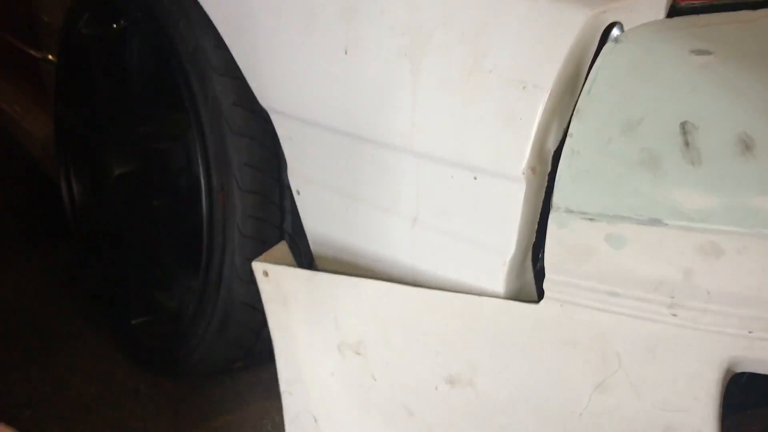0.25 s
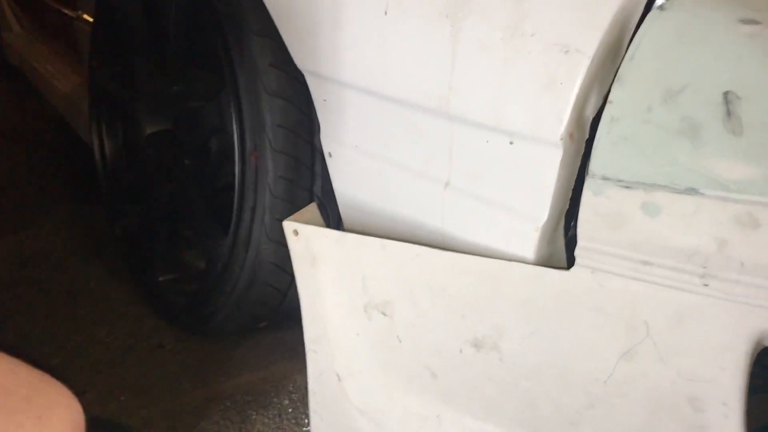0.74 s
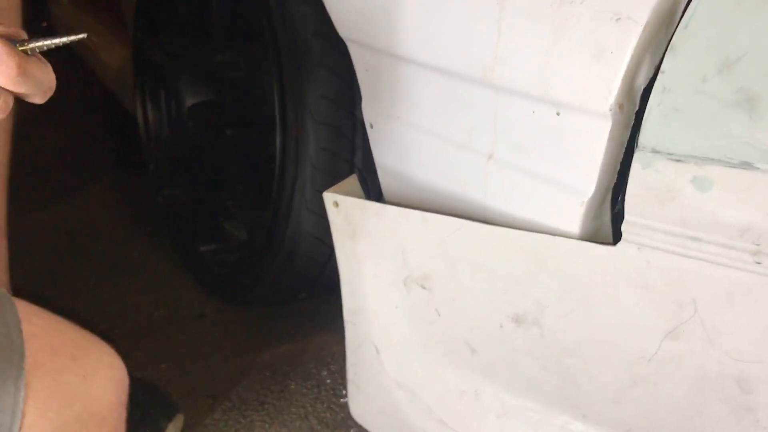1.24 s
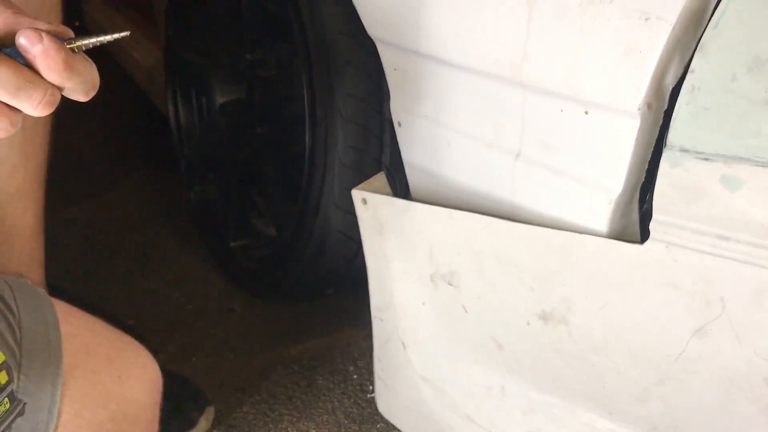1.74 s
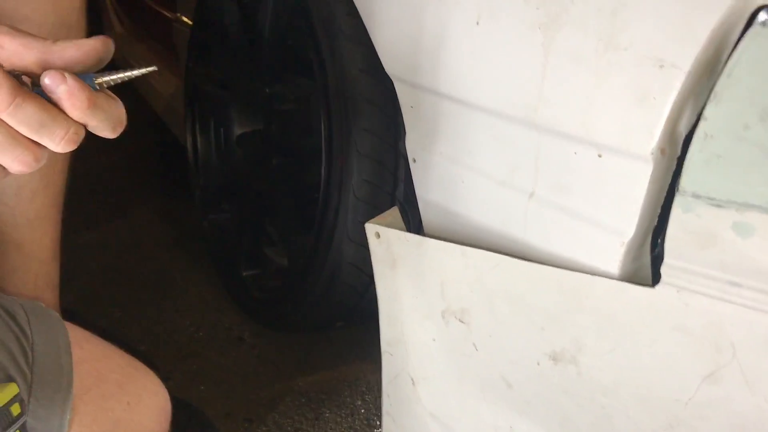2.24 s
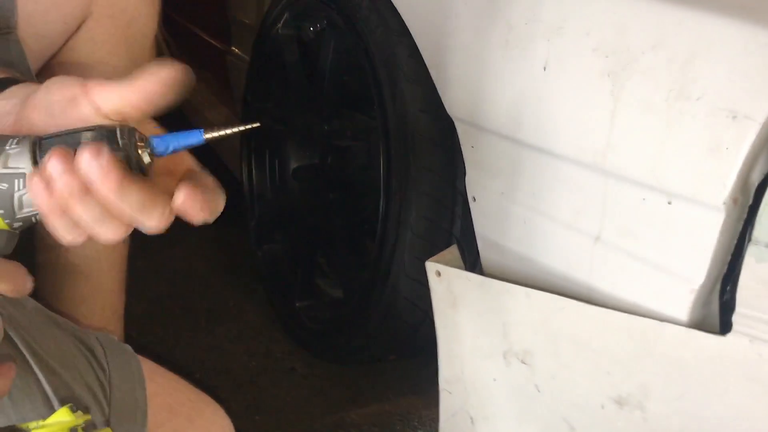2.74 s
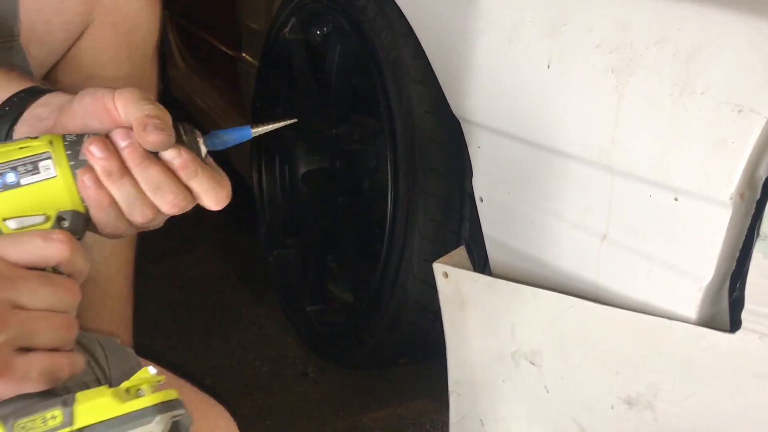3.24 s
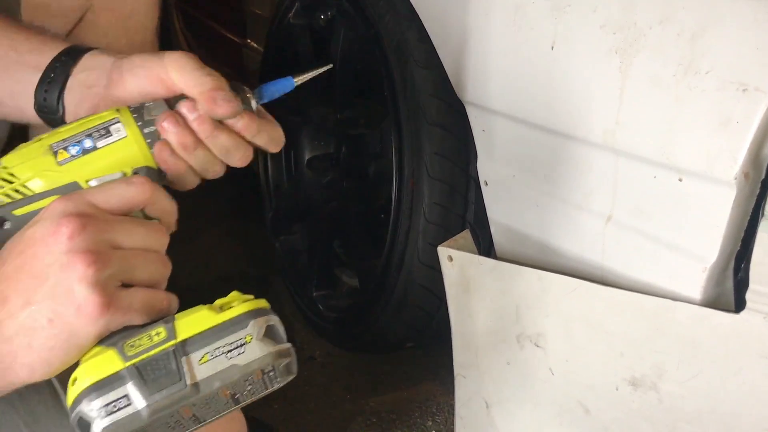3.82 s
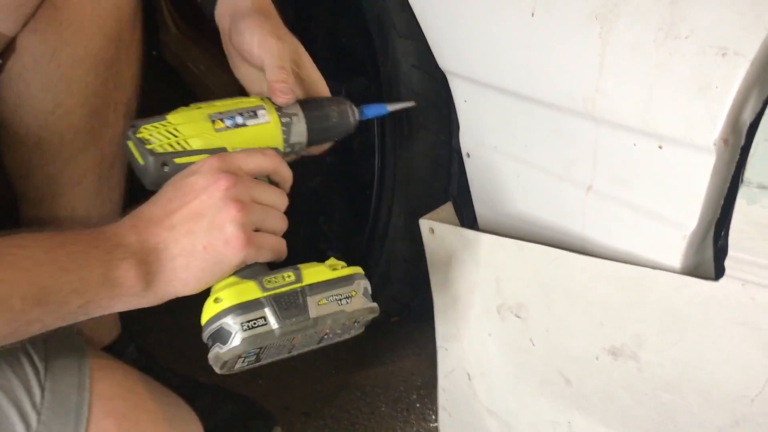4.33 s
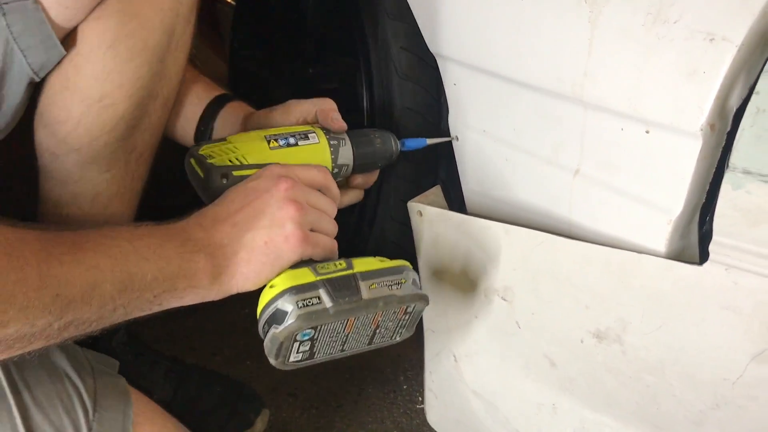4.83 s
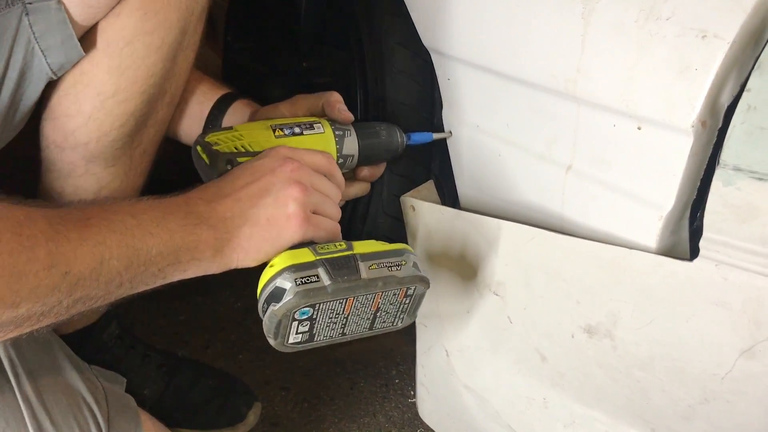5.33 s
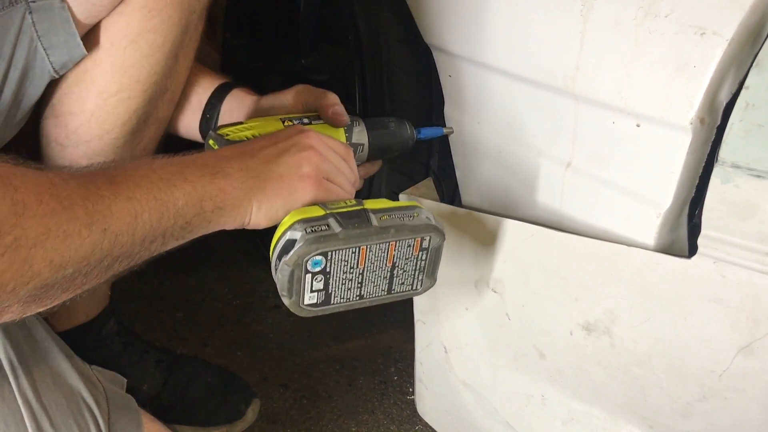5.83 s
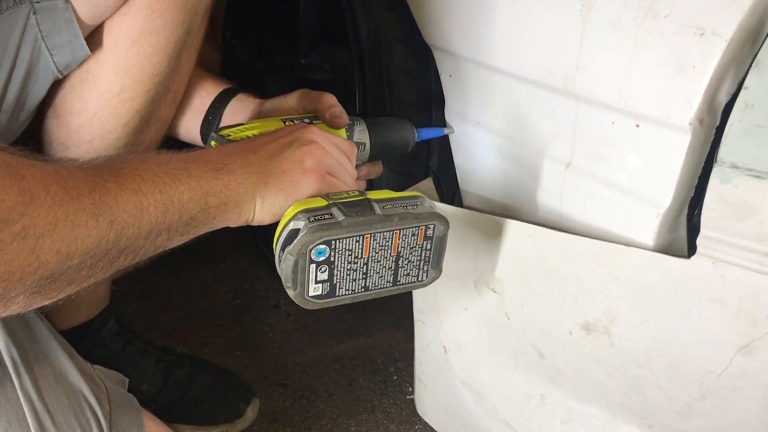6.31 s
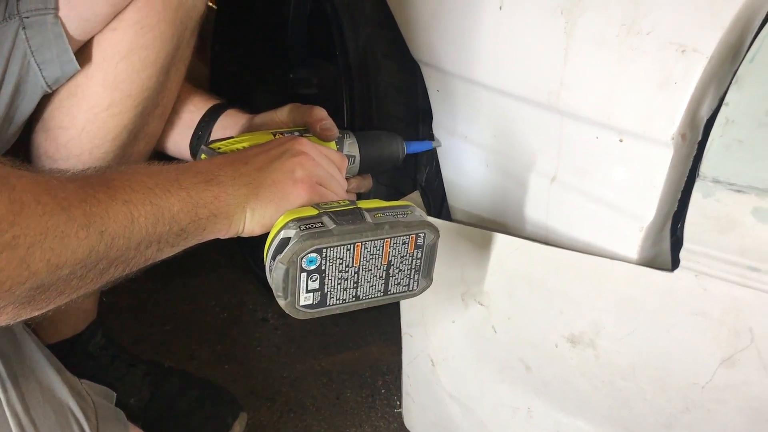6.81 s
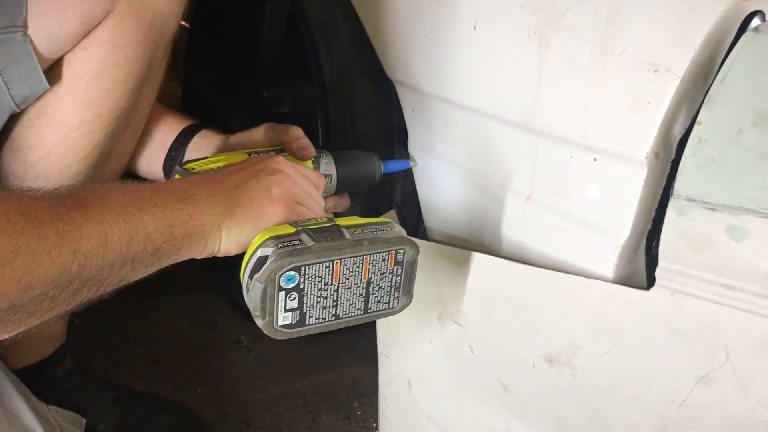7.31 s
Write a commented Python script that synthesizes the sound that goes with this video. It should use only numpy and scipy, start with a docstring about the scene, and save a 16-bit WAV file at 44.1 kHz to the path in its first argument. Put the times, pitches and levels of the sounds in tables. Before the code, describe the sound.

In a quiet open workshop at night, faint crickets and distant rumble lie under close metallic clicks and pings as a bit is fitted to a cordless drill. The motor creeps softly with a thin whine, then the clutch rattles harshly twice. After a lull, the bit knocks and rubs a hollow car panel. Finally the drill whirrs up, and the sheet shakes and moans. Close microphone, little echo.

```python
"""An open shop at night, beside a car: a cordless drill is handled, run slowly and set to a body panel.
The bit clicks into the chuck, the motor creeps, the clutch rattles twice, the bit knocks the panel and cuts.
Motor and cutting are filtered noise with tones that follow speed; clicks, slips and knocks are short noise
bursts ringing the resonances of chuck, housing, steel bit and sheet. Crickets are pulsed wing tones,
the insect chorus is narrow noise, and air, a passing hum and far rumble lie beneath."""
import sys
import numpy as np
from scipy import signal
from scipy.io import wavfile
from scipy.ndimage import uniform_filter1d

SR = 44100
rng = np.random.default_rng(int(sys.argv[2]) if len(sys.argv) > 2 else 0)


def dump_mix(stems):
    """Bounce the given channels to the path in sys.argv[1] as a 16-bit WAV at rate SR."""
    frames = np.atleast_2d(stems).T  # one column per channel
    limited = np.clip(frames, -1, 1)  # hard clip at full scale
    pcm = np.round(limited * 32767).astype(np.int16)
    wavfile.write(sys.argv[1], SR, pcm)


N = 333396
T = np.arange(N) / SR  # time in s


def amp(db):
    """Logarithmic level: converts decibels to gain."""
    return 10 ** (np.asarray(db) / 20)


def decay(t, t60):
    """Exponential damping: the level falls 60 dB in t60 seconds."""
    return amp(-60 * t / t60)


def evened(x):
    """Equal power: scales to rms 1."""
    return x / np.sqrt(np.mean(x ** 2) + 1e-20)


def peaked(x):
    """Equal peak: scales to peak 1."""
    return x / abs(x).max()


def curve(rows, col=1):
    """Linear interpolation: one column of a table over time."""
    rows = np.asarray(rows, float)
    return np.interp(T, rows[:, 0], rows[:, col])


def level(rows, col=1, fade=.006):
    """Envelope: gain from a dB column, fading to silence outside the span of the rows."""
    inside = np.clip(np.minimum(T - rows[0][0], rows[-1][0] - T) / fade + 1, 0, 1)
    return amp(curve(rows, col)) * inside


def held(rows, fade):
    """Gating: gain held from start to end of each row (start s, end s, dB), with the fades outside."""
    return sum(amp(db) * np.clip(np.minimum(T - s, end - T) / fade + 1, 0, 1) for s, end, db in rows)


def colour(x, spectrum=None, peaks=(), base_db=-12):
    """Source-filter principle: a minimum-phase filter of a smooth spectrum times resonances over a base."""
    hz = np.abs(np.fft.fftfreq(8192, 1 / SR))
    power = amp(2 * base_db) + 0 * hz
    for f, width, db in peaks:
        power = power + amp(2 * db) / (1 + (2 * (hz - f) / width) ** 2)
    log_gain = np.log(power) / 2
    if spectrum:
        f, db = np.transpose(spectrum)
        smooth_db = np.interp(np.log(hz + 1), np.log(f), np.maximum(db, -90))
        log_gain = log_gain + np.log(amp(smooth_db))
    # the Hilbert transform of the log gain gives the phase of a causal filter
    taps = np.fft.ifft(np.exp(np.conj(signal.hilbert(log_gain)))).real[:4096]
    return signal.oaconvolve(x, taps / np.linalg.norm(taps))[:len(x)]


def band(x, lo_hz, hi_hz):
    """Band limitation: a Butterworth band-pass."""
    return signal.sosfilt(signal.butter(2, [lo_hz, hi_hz], "band", fs=SR, output="sos"), x)


def wander(per_s, size=N):
    """Low-pass randomness: a slow random curve, its knots scaled to rms 1."""
    knots_per_s = 400
    knots = rng.standard_normal(int(max(size / SR, 1) * knots_per_s) + 2)
    slow = evened(uniform_filter1d(knots, max(round(knots_per_s / per_s), 1)))
    return np.interp(T[:size] * knots_per_s, np.arange(len(knots)), slow)


def grit(per_s, spread_db, hiss):
    """Shot noise: sparse clicks of uneven size over smooth hiss."""
    size = amp(spread_db * np.minimum(rng.exponential(1, N), 4)) * rng.choice([-1, 1], N)
    clicks = evened(size * (rng.random(N) < per_s / SR))
    return evened(clicks + hiss * rng.standard_normal(N))


def tone(hz, blur_hz, waver_db=0.0, size=N):
    """Frequency modulation: a sine of rms 1, trembling in pitch and wavering in level."""
    turns = np.cumsum(hz + blur_hz * wander(60, size)) / SR
    return np.sqrt(2) * np.sin(2 * np.pi * turns) * amp(waver_db * wander(25, size))


def add(mix, s, sound):
    """Superposition: mixes a sound in at a time in seconds."""
    part = mix[round(s * SR):][:len(sound)]
    part += sound[:len(part)]


# Spectrum of the loaded motor. Each row: frequency in Hz, relative level in dB.
WHIRR = [(350, -42), (600, -9.5), (1220, -6), (1670, -4.5), (2060, -5.5), (2720, 0), (3350, -2.5),
         (4070, -1.5), (4870, -4), (7080, -2.5), (10600, -5.5), (15000, -7.5), (15800, -8), (16500, -15)]
# Resonances of the plastic housing. Each row: frequency in Hz, width in Hz, relative level in dB.
HOUSING = [(1256, 254, 2), (1657, 108, 5.5), (1830, 30, -1.5), (2080, 86, -0.5), (2693, 230, 1.5),
           (3060, 18, 4), (3910, 56, -0.5), (4250, 490, 0), (6620, 520, -23), (9100, 220, -24.5),
           (12200, 150, 2.5)]
# Motor under load. Each row: time in seconds, shaft rate in Hz.
SHAFT = [(6.42, 176), (6.48, 188), (6.54, 198), (6.62, 206), (6.65, 233), (6.68, 248), (6.72, 257),
         (6.77, 267), (6.9, 321), (7.05, 335), (7.24, 337), (7.29, 322), (7.33, 335), (7.4, 346),
         (7.48, 352), (7.56, 355)]
# Course of the cut. Each row: time in seconds, whirr in dB, panel shake in dB (before its final gain).
CUT = [(6.33, -82, -70), (6.366, -49, -46), (6.42, -43, -39.5), (6.586, -39.5, -38.5), (6.7, -37.5, -39),
       (6.8, -34.5, -35.5), (7.226, -34, -37.5), (7.302, -29, -34.5), (7.47, -29, -30), (7.56, -30, -27.5)]


def whirr():
    """Source-filter principle: gritty noise and one knock a turn ring the housing, uneven band by band."""
    turns = np.cumsum(curve(SHAFT) * (1 + 0.0092 * wander(50))) / SR
    knocks = evened(np.diff(np.floor(turns), prepend=0))  # gives a faint comb of shaft orders
    noise = colour(grit(4000, 3, 1.6) + .25 * knocks, WHIRR, HOUSING, base_db=0)
    below = [0 * noise] + [band(noise, 20, hz) for hz in (1500, 2300, 3500, 5500, 9000)] + [noise]
    chatter = sum(part * amp(0.7 * wander(30)) for part in np.diff(below, axis=0))
    return evened(chatter) * level(CUT) * amp(0.55 * wander(27))


# Shaft orders that sing out. Each row: start in seconds, end in seconds, multiple of the shaft rate, level in dB.
SINGING = [(6.64, 7.6, 3, -51), (6.44, 6.61, 15, -55), (6.625, 6.715, 12, -42), (6.745, 6.77, 12, -47),
           (7.0, 7.26, 7, -49), (7.0, 7.3, 12, -52), (7.31, 7.6, 12, -40), (6.64, 6.9, 5, -52),
           (6.8, 7.6, 2, -53), (7.28, 7.6, 5, -48), (7.3, 7.6, 8, -47)]


def singing_orders():
    """Harmonic orders: tones at whole multiples of the shaft rate rise and fall with motor speed."""
    return sum(held([(s, end, db)], .012) * tone(order * curve(SHAFT), 10, 2.0)
               for s, end, order, db in SINGING)


# The housing buzzes as the bit bites. Each row: start in seconds, end in seconds, level in dB.
BUZZ = [(6.63, 6.76, -47), (6.685, 6.71, -36)]


def housing_buzz():
    """Narrow-band noise: the housing buzzes between 1600 and 1710 Hz."""
    return held(BUZZ, .015) * evened(band(rng.standard_normal(N), 1600, 1710))


# Speed control tone, stepping with the trigger. Each row: start in seconds, end in seconds, pitch in Hz,
# first partial in dB, second partial in dB.
WHINE = [(1.47, 1.53, 6145, -72, -73), (1.53, 2.75, 5853, -61.5, -67), (3.155, 3.222, 6180, -74, -67),
         (3.222, 3.264, 6030, -72, -61), (3.264, 3.332, 5940, -72, -63), (3.332, 3.41, 5825, -72, -66),
         (3.735, 3.775, 5800, -76, -66), (6.205, 6.283, 6150, -72, -75), (6.283, 6.348, 6215, -66.5, -69),
         (6.348, 6.55, 5920, -70, -67)]
THROB_PER_S, THROB_DB = 42, 2.5


def switching_whine():
    """Amplitude modulation: two harmonic partials of the switching tone throb together."""
    row = np.maximum(np.searchsorted([row[0] for row in WHINE], T) - 1, 0)
    start, end, hz, first_db, second_db = np.array(WHINE)[row].T
    on = uniform_filter1d(1. * (T > start) * (T < end), size=200)
    throb_turns = np.cumsum(THROB_PER_S + 6 * wander(8)) / SR
    throb = amp(THROB_DB * np.sin(2 * np.pi * throb_turns))
    partials = amp(first_db) * tone(hz, 4, .8) + amp(second_db) * tone(2 * hz, 6, 2)
    return on * throb * partials


# Slow motor runs. Each row: start in seconds, end in seconds, first level in dB, last level in dB.
CREEP = [(1.556, 2.747, -54.5, -51.5), (3.306, 3.611, -39, -42.5), (3.783, 3.932, -32, -43.5)]
# Spectrum of the slow motor. Each row: frequency in Hz, relative level in dB.
CREEP_COLOUR = [(150, -15), (250, -4.5), (374, -7), (999, 1), (1520, 2), (2710, 1), (5100, -9), (6070, -8),
                (6400, -10), (10300, -19), (12000, -13.5), (15700, -22.5), (16500, -25.5)]
SPIN_UP_DB_PER_S, COAST_DB_PER_S = 500, 184.5


def creeping_motor():
    """Exponential growth and decay: gritty noise spins up, runs, then coasts down."""
    gain = 0
    for s, end, first_db, last_db in CREEP:
        run_db = np.interp(T, [s, end], [first_db, last_db])
        rise_db = SPIN_UP_DB_PER_S * np.maximum(s - T, 0)
        coast_db = COAST_DB_PER_S * np.maximum(T - end, 0)
        gain = gain + amp(run_db - rise_db - coast_db)
    return evened(colour(grit(2500, 1, 0.83), CREEP_COLOUR)) * gain * amp(1.3 * wander(40))


# Gear tones of the slow motor. Each row: time in seconds, base pitch in Hz, level in dB.
MESH = [(1.6, 306, -62), (1.658, 301, -67), (1.712, 335.3, -64), (1.818, 322.5, -61), (1.902, 338, -67),
        (2.104, 325.6, -62), (2.388, 350.4, -61), (2.52, 337.5, -64), (2.6, 310, -60), (2.638, 269, -55),
        (2.72, 288, -71)]
# Partials of the gear tones. Each row: multiple of the base pitch, relative level in dB.
MESH_ORDERS = [(3, -2), (4, 0), (5, -4)]


def gear_mesh():
    """Harmonic series: meshing gears sound multiples of one gliding base pitch."""
    partials = sum(amp(db) * tone(order * curve(MESH), 7.9, 2.8) for order, db in MESH_ORDERS)
    return level(MESH, 2) * partials


# Distinct clutch slips. Each row: time in seconds, relative peak in dB.
SLIPS = [(3.4228, -8), (3.4258, -11), (3.442, -9), (3.4545, -9), (3.5672, -14), (3.5895, -11),
         (3.5965, -13), (3.6058, -11), (3.6165, -18), (3.7768, -8), (3.7905, -11), (3.7995, -11),
         (3.9003, -14)]
# Two rattles of fast slipping. Each row of a rattle: time in seconds, relative level in dB, slips per second.
RATTLE = [
    [(3.45, -19.5, 165), (3.507, -16.5, 250), (3.57, -18, 150), (3.59, -24.5, 90)],
    [(3.78, -20.5, 120), (3.832, -16, 200), (3.9, -16, 135), (3.92, -54.5, 54)],
]
# Spectrum of the clutch. Each row: frequency in Hz, relative level in dB.
CLUTCH = [(47, -76.5), (80, -47), (140, -16.5), (292, -13), (364, -17), (1040, -3), (1390, -6),
          (4330, -5.5), (13800, -15.5), (15400, -16), (16500, -34)]


def clutch():
    """Impulse excitation: each slip is a steel blow with clatter that rings the housing; gears grind beneath."""
    blows, grind = np.zeros(N), np.zeros(N)
    blows[[round(s * SR) for s, _ in SLIPS]] = amp([db for _, db in SLIPS])
    for rows in RATTLE:
        turns = np.floor(np.cumsum(curve(rows, 2) * (1 + .2 * wander(150))) / SR)
        slips = np.diff(turns, prepend=0) > 0
        blows += slips * level(rows, fade=0.0011) * amp(6.0 + 1.2 * wander(400))
        grind += level(rows, fade=.003) * amp(-3)
    t = T[:2500]
    snap, loose_parts = decay(t, 0.018), 0.23 * decay(t, 0.064)
    clatter = (1 - np.exp(-t / 0.000099)) * (snap + loose_parts)
    noise_gain = signal.oaconvolve(blows, clatter)[:N] + grind
    drive = noise_gain * rng.standard_normal(N) + 3.2 * blows
    return amp(-7.0) * colour(drive, CLUTCH, HOUSING, base_db=-4.5)


# The bit knocks the panel. Each row: time in seconds, peak of the boom in dB,
# then relative to it the higher modes in dB and the tick in dB.
KNOCKS = [(4.977, -28.5, -2.5, -25), (5.197, -33, -19, -26), (5.272, -40.5, 7, -7), (5.379, -30, 1, -10.5),
          (5.419, -34, -5, -5), (5.447, -33, -15, -8), (5.468, -34, -16, 0), (5.508, -43, -10, -3),
          (5.523, -30.5, -18, -4), (5.566, -37, -2, -25), (5.587, -35, -10, 2.5), (6.249, -52.5, 7, 3),
          (7.445, -18, -2, -18)]
# Modes of the sheet. Each row: frequency in Hz, width in Hz, relative level in dB.
PANEL = [(110, 30, -2), (132, 105, 13.5), (223, 30, 3.5), (317, 86, -5.5), (433, 35, -6), (590, 74, 9),
         (635, 19, 8), (723, 33, 12.5), (1020, 74, -6), (1360, 75, -7)]
# Resonances of the chuck. Each row: frequency in Hz, width in Hz, relative level in dB.
CHUCK = [(1050, 100, -18), (2240, 460, -5), (3380, 720, 0), (4570, 150, 2.5), (5840, 250, -16)]
# Modes of the steel bit. Each row: frequency in Hz, width in Hz, relative level in dB.
BIT = [(9100, 22, 0), (12100, 90, 0), (15000, 90, 0)]
KNOCK_T60, TOP_MODES_DB, CONTACT_DB = 0.22, -1.5, -11  # s; the levels add to the higher modes


def panel_knocks():
    """Modal response: a push on the sheet booms in its modes, with a contact thud and a steel tick."""
    t, out = T[:16000], np.zeros(N)
    yields = np.clip(t / .004, 0, 1) ** 3  # the sheet gives way before it snaps back
    for s, db, high_db, tick_db in KNOCKS:
        push = rng.standard_normal(len(t))
        fading = np.exp(-t / 0.0053) + 0.51 * decay(t, KNOCK_T60)
        boom = colour(push * yields * fading, peaks=PANEL, base_db=-30.0)
        top = decay(t, .2) * band(boom, 500, 1700)  # higher modes die sooner
        thud = band(push * yields * decay(t, 0.06), 600, 1440)
        higher = peaked(band(boom, 241, 440)) + amp(TOP_MODES_DB) * peaked(top) + amp(CONTACT_DB) * peaked(thud)
        tick = band(colour(push * decay(t, 0.079), peaks=CHUCK + BIT, base_db=-10), 1000, 21500)
        knock = peaked(band(boom, 113, 357)) + amp(high_db) * higher + amp(tick_db) * peaked(tick * yields)
        add(out, s, amp(db) * knock)
    return out


# The bit slides on the panel. Each row: time in seconds, relative level in dB.
DRAG = [(5.37, -60), (5.39, -34), (5.5, -35), (5.58, -30.5), (5.68, -39.5), (5.8, -62)]


def panel_drag():
    """Friction excitation: irregular grit from the sliding bit drives the sheet in a low rub and a rasp."""
    rub = colour(grit(305, 3.2, 1.0), peaks=PANEL, base_db=-4.0)
    rasp = amp(-7.5) * evened(band(rub, 360, 1700))
    return amp(-8) * level(DRAG) * amp(2.85 * wander(30)) * (evened(band(rub, 55, 490)) + rasp)


# Spectrum of the sheet under the cut. Each row: frequency in Hz, relative level in dB.
SHAKE = [(29, -66), (50, -36), (128, -8), (257, -9.5), (295, 2), (378, -4), (414, -2.5), (547, -8),
         (745, -11.5), (843, -5.5), (2000, -4), (2600, -35), (4400, -120)]


def panel_shake():
    """Forced vibration: the cut shakes the sheet with grit coloured by its modes."""
    shake = evened(colour(grit(250, 1, 0.85), SHAKE, PANEL, base_db=-1.5))
    return amp(-2.0 + 1.4 * wander(25)) * level(CUT, 2) * shake


# The panel moans. Each row: start in seconds, end in seconds, pitch in Hz, level in dB.
MOANS = [(6.386, 6.448, 296, -51), (6.449, 6.548, 420, -48), (6.69, 6.777, 292, -43.5),
         (6.756, 6.86, 415, -44.5), (6.847, 6.937, 299, -40.5), (6.969, 7.26, 409, -47.5),
         (7.03, 7.27, 505, -47), (7.262, 7.344, 298, -30), (7.369, 7.521, 413, -46), (7.43, 7.5, 233, -39),
         (7.439, 7.548, 581, -38), (7.483, 7.557, 672, -43)]


def panel_moans():
    """Tonal vibration: the sheet moans in short swelling tones of trembling pitch."""
    out = np.zeros(N)
    for s, end, hz, db in MOANS:
        swell = signal.windows.tukey(round((end - s) * SR), .6)
        add(out, s, amp(db) * swell * tone(hz, 8.8, 2.7, len(swell)))
    return out


# Clicks of chuck jaws, bit and trigger. Each row: time in seconds, peak of the body in dB,
# treble relative to it in dB, main ring in Hz.
CLICKS = [(0.385, -27.5, 8.5, 1180), (0.454, -48, 6, 2440), (0.478, -47, 4, 2700), (0.491, -36, 5, 1810),
          (0.506, -31, -6, 3060), (0.609, -30.5, 6.5, 2300), (0.616, -35, -20, 2520), (0.712, -52, 3, 2500),
          (0.723, -37.5, 4, 2560), (0.75, -30.5, 13, 2300), (0.754, -28, -22, 2980),
          (0.759, -29, -20, 3070), (0.792, -36, -9, 2660), (0.856, -29.5, 5, 6000), (0.989, -42, -8, 2610),
          (1.012, -45, -8, 2570), (1.052, -27.5, 5, 3280), (1.056, -10.5, 1.5, 3300),
          (1.252, -37.5, -3, 3500), (1.466, -36, 1, 2460), (1.61, -38, -6, 6400), (1.712, -43, -10, 1340),
          (1.86, -43, 6, 5970), (2.124, -25, -3.5, 794), (2.748, -48, -2, 2480), (2.775, -53, 0, 3800),
          (2.932, -32.5, -4, 2050), (3.046, -48, -3, 2510), (3.157, -39, 1, 2530), (3.321, -35, -6, 2690),
          (3.736, -48, 5, 2700), (3.749, -33, -1, 1280), (4.105, -47, 6, 2510), (4.171, -42, 3, 2360),
          (4.244, -42, -13, 4540), (4.632, -35, -8, 2380), (6.06, -53, -3, 2500), (6.114, -47, -3, 2500),
          (6.143, -49, 2, 2520), (6.204, -48, 2, 2570), (6.281, -39.5, -4, 1690)]
SCRAPE_S, CLICK_T60, TREBLE_T60 = 0.0024, 0.02, 0.033  # all in s


def clicks():
    """Impulse excitation: a short scrape rings the chuck and one main resonance, with a damped treble."""
    t, out = T[:4000], np.zeros(N)
    for s, db, treble_db, hz in CLICKS:
        noise = rng.standard_normal(len(t))
        burst = noise * decay(np.maximum(t - SCRAPE_S, 0), CLICK_T60)
        body = band(colour(burst, peaks=CHUCK + [(hz, 350, 6)], base_db=-8.0), 1000, 8000)
        treble = band(burst * decay(t, TREBLE_T60), 3900, 22000)
        add(out, s, amp(db) * (peaked(body) + amp(treble_db) * peaked(treble)))
    return out


# The bit is struck. Each row: time in seconds, peak of its lowest mode in dB, peak of the middle mode in dB.
PINGS = [(0.3853, -43, -26.5), (0.6078, -33, -44), (0.7526, -29, -26), (1.6087, -58, -43),
         (1.708, -42, -56), (1.859, -44, -56)]


def bit_pings():
    """Modal ringing: a brief burst excites the narrow modes of the steel bit."""
    t, out = T[:8000], np.zeros(N)
    for s, low_db, high_db in PINGS:
        burst = rng.standard_normal(len(t)) * decay(t, 0.0092)
        low, middle, top = [peaked(colour(burst, peaks=[mode], base_db=-32)) for mode in BIT]
        add(out, s, amp(low_db) * low + amp(high_db) * (middle + 0.46 * top))
    return out


# The bit slides in the jaws. The one row: start in seconds, end in seconds, level in dB.
SLIDE = (.765, .85, -47.5)


def bit_slide():
    """Friction excitation: grit from bit against jaws rings the steel bit."""
    scrape = evened(band(colour(grit(1200, 3, .5), peaks=BIT, base_db=-17), 4600, 13300))
    return scrape * held([SLIDE], .01) * amp(2.2 * wander(30))


# Fingers tap the plastic grip. Each row: time in seconds, peak in dB.
TAPS = [(.438, -42.5), (.486, -43), (.756, -37), (0.786, -40.5), (.924, -38), (.936, -36.5), (.954, -42)]
TAP_HZ, TAP_WIDTH_HZ, TAP_T60 = 980, 330, 0.032  # T60 in s


def finger_taps():
    """Damped resonance: a soft burst sounds one broad mode of the grip."""
    t, out = T[:4000], np.zeros(N)
    for s, db in TAPS:
        burst = rng.standard_normal(len(t)) * decay(t, TAP_T60)
        grip = colour(burst, peaks=[(TAP_HZ, TAP_WIDTH_HZ, 0)], base_db=-18)
        add(out, s, amp(db) * peaked(band(grip, 600, 3000)))
    return out


# Hands on the grip. Each row: start in seconds, end in seconds, level in dB before its unsteadiness.
RUSTLE = [(.42, 1.15, -66), (2.85, 3.0, -67), (4.1, 4.28, -63), (5.38, 5.66, -68)]
# Spectrum of skin on plastic. Each row: frequency in Hz, relative level in dB.
SKIN = [(300, -25), (900, 0), (2000, -5.5), (5000, -9.5), (9000, -17), (16000, -16)]


def skin_rustle():
    """Friction noise: skin on the grip rustles as unsteady grit."""
    skin = evened(colour(grit(1300, 5.7, 0.97), SKIN)) * amp(4 + 2 * wander(30))
    return skin * held(RUSTLE, .14)


def shop(x):
    """Reverberation: sparse echoes of random sign decay, the treble sooner."""
    taps = np.zeros(SR // 2)
    at = np.arange(300, len(taps) - 20, 20) + rng.integers(0, 20, (len(taps) - 301) // 20)
    taps[at] = rng.choice([-1., 1.], len(at))
    t = T[:len(taps)]
    tail = band(taps, 150, 3500) * decay(t, 0.1) + band(taps, 2100, 15000) * decay(t, 0.085)
    return signal.oaconvolve(x, tail / np.linalg.norm(tail))[:N]


# Cricket chirps. Each row: start in seconds, end in seconds, wing pitch in Hz, relative level in dB.
CHIRPS = [(0, .16, 4600, -60), (1.09, 1.3, 4720, -63), (2.36, 2.6, 4580, -56), (2.59, 2.81, 4480, -56),
          (3.05, 3.25, 4250, -66), (4.24, 4.49, 4570, -58), (4.65, 4.92, 4750, -66),
          (5.16, 5.42, 4720, -63), (5.885, 6.13, 4580, -57)]
STROKES_PER_S = 46.2


def crickets():
    """Amplitude modulation: each chirp is a train of wing strokes on two close wing tones."""
    out, wobble = np.zeros(N), wander(80)
    for s, end, hz, db in CHIRPS:
        t = T[:round((end - s) * SR)]
        strokes = np.maximum(.7 - np.cos(2 * np.pi * STROKES_PER_S * t), .3)
        swell = signal.windows.tukey(len(t), .2)
        turns = np.cumsum(hz + 25 * wobble[round(s * SR):][:len(t)]) / SR
        wings = np.sin(2 * np.pi * turns) + .33 * np.sin(2 * np.pi * 1.085 * turns)
        add(out, s, amp(db) * strokes * swell * wings)
    return out


# Far insects. Each row: frequency in Hz, width in Hz, level in dB.
CHORUS = [(2584, 370, -61), (2904, 590, -65), (4490, 850, -68), (6420, 730, -79)]


def insect_chorus():
    """Narrow-band noise: many insects merge into bands that waver in level."""
    out = np.zeros(N)
    for f, width, db in CHORUS:
        edges = f - width / 2, f + width / 2
        noise = band(band(rng.standard_normal(N), *edges), *edges)
        out += amp(db + 1.69 * wander(12)) * evened(noise)
    return out


# A hum comes and goes. Each row: start in seconds, end in seconds, level in dB.
HUM = [(0, .15, -62.5), (.36, 1.4, -60.5), (4.1, 4.8, -65), (4.9, 6.3, -64)]


def hum():
    """Steady tone: one slightly trembling sine at 229.5 Hz."""
    return held(HUM, 0.071) * tone(229.5, 2.57)


# Spectrum of the far rumble. Each row: frequency in Hz, relative level in dB.
RUMBLE = [(15, -50), (25, -25.5), (38, -10.5), (56, 0.5), (76, -1.5), (110, -1.5), (139, -10.5),
          (286, -14.5), (400, -37), (520, -42.5), (880, -120)]
# Course of the rumble. Each row: time in seconds, deep drone in dB, upper rumble in dB.
RUMBLE_LEVEL = [(0.0, -62, -56), (1.2, -58, -54), (2.4, -60, -51.5), (2.9, -52.5, -49), (3.4, -50.5, -49.5),
                (3.7, -56, -55.5), (4.15, -50.5, -52.5), (4.6, -56, -53), (5.6, -58, -51.5),
                (6.0, -62.5, -58), (7.56, -61, -54)]
DRONE_HZ, DRONE_NOISE_DB = 53, -1  # the noise level is relative to the drone


def far_rumble():
    """Low-frequency noise: a wavering drone within deep noise, and a separate upper band."""
    low = colour(rng.standard_normal(N), RUMBLE)
    drone = amp(DRONE_NOISE_DB) * evened(band(low, 33.0, 73.0)) + tone(DRONE_HZ, 3.6, 3.5)
    return level(RUMBLE_LEVEL) * drone + level(RUMBLE_LEVEL, 2) * evened(band(low, 85, 330))


# Spectrum of the night air. Each row: frequency in Hz, relative level in dB.
NIGHT = [(150, -33.5), (250, -23), (325, -12.5), (560, -16), (611, -9), (781, -16), (1090, -9.5),
         (1940, -21), (2570, -7), (3410, -28.5), (4670, -25), (5370, -24.5), (7630, -37.5), (13800, -36),
         (16500, -47.5)]


def night_air():
    """Broadband noise: a coloured hiss drifts slowly around -58 dB."""
    return amp(-58 + 1.0 * wander(2.4)) * evened(colour(rng.standard_normal(N), NIGHT))


def scene():
    """Direct and reverberant sound: the drill close by with a little echo, over the night."""
    motor = whirr() + singing_orders() + housing_buzz() + switching_whine() + creeping_motor() + gear_mesh()
    panel = panel_knocks() + panel_drag() + panel_shake() + panel_moans()
    hands = clicks() + bit_pings() + bit_slide() + finger_taps() + skin_rustle()
    near = motor + clutch() + panel + hands
    wings = crickets()
    night = 0.75 * wings + .5 * shop(wings) + insect_chorus() + hum() + far_rumble() + night_air()
    return (near + amp(-21.0) * shop(near) + night)[None]


EDGE_HZ = 15900


def record(dry):
    """Transducer response: bass roll-off, a narrow dip of the microphone port, soft overload, band limit."""
    thinned = signal.sosfilt(signal.butter(4, 44, "high", fs=SR, output="sos"), dry)
    dipped = thinned - .5 * band(thinned, 10200, 10960)
    softened = .6 * np.tanh(dipped / .6)  # rounds the loudest blows
    low_pass = signal.firwin(767, EDGE_HZ, window=("kaiser", 12), fs=SR)
    return signal.oaconvolve(softened, low_pass[None], "same")


dry = scene()
out = record(dry)
dump_mix(out)
```